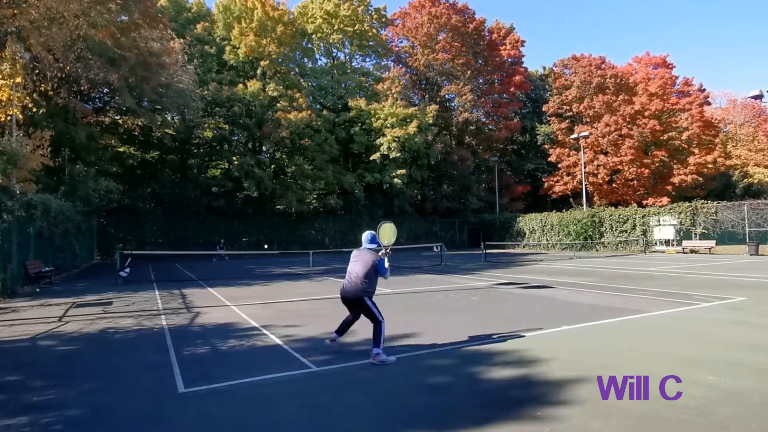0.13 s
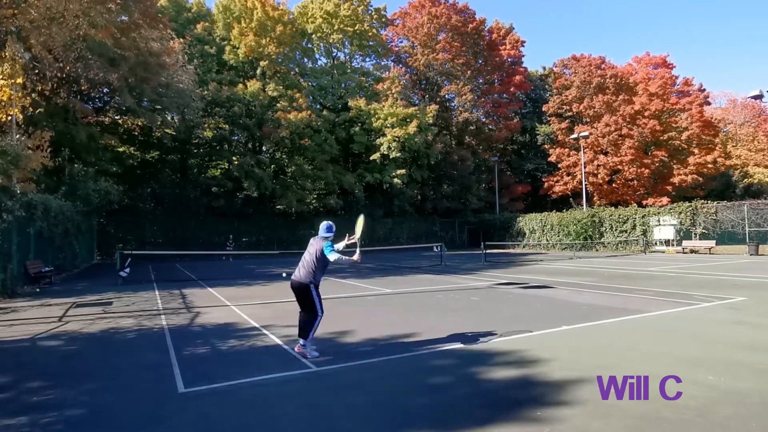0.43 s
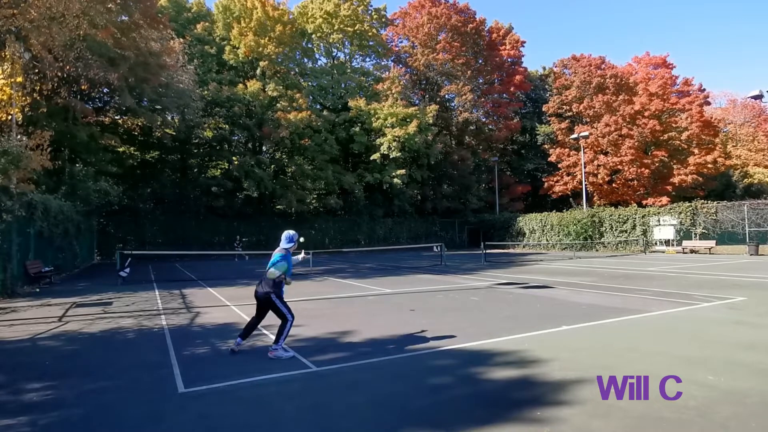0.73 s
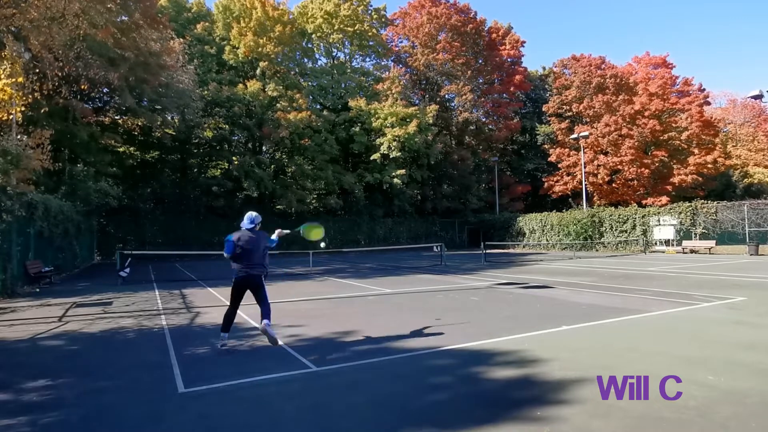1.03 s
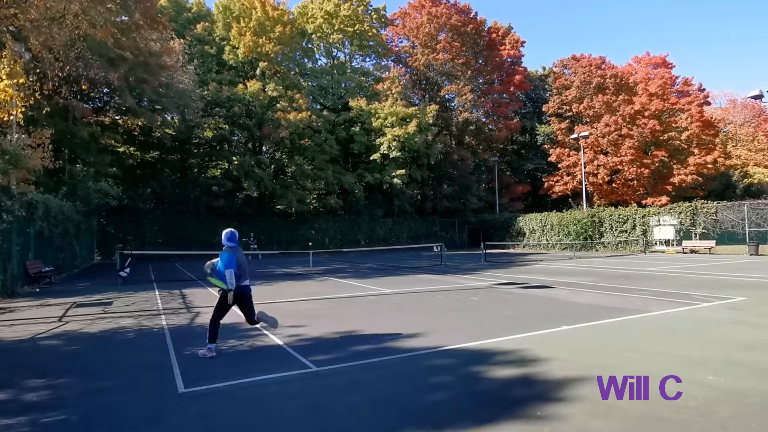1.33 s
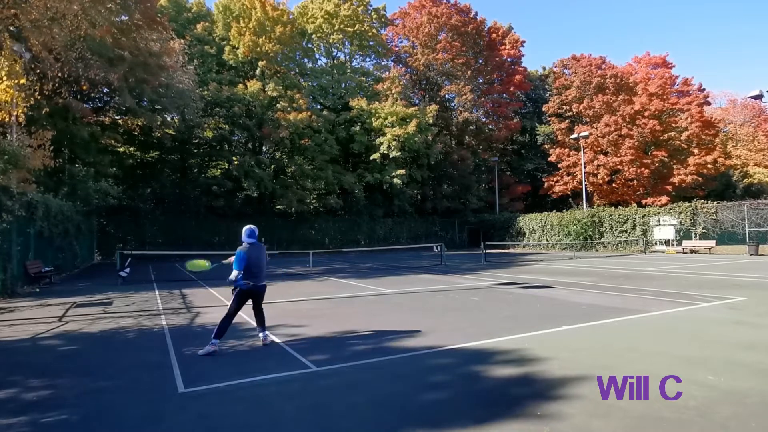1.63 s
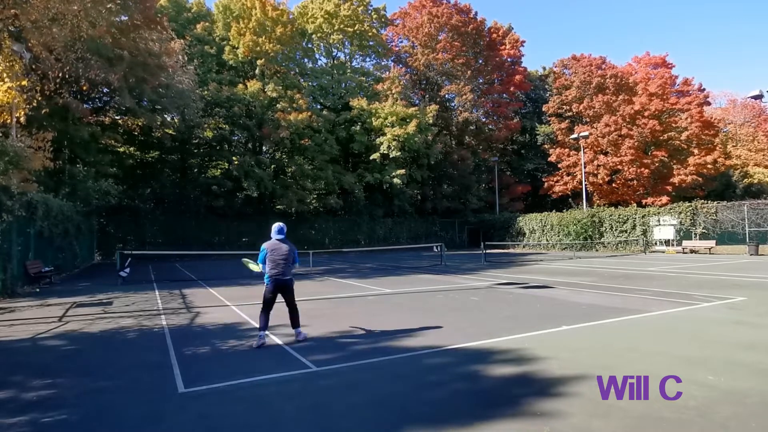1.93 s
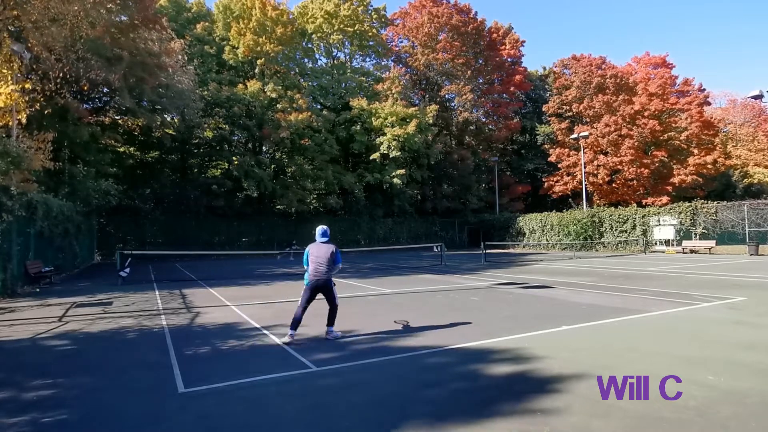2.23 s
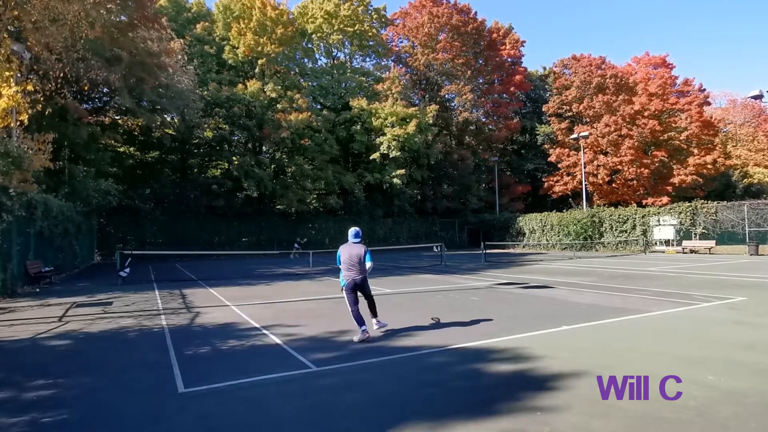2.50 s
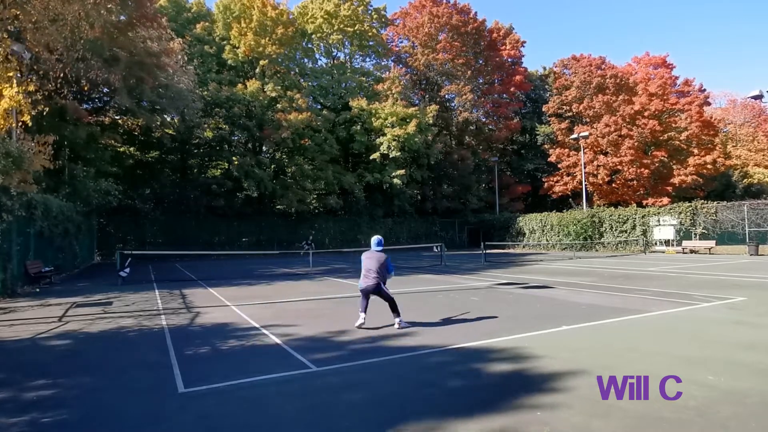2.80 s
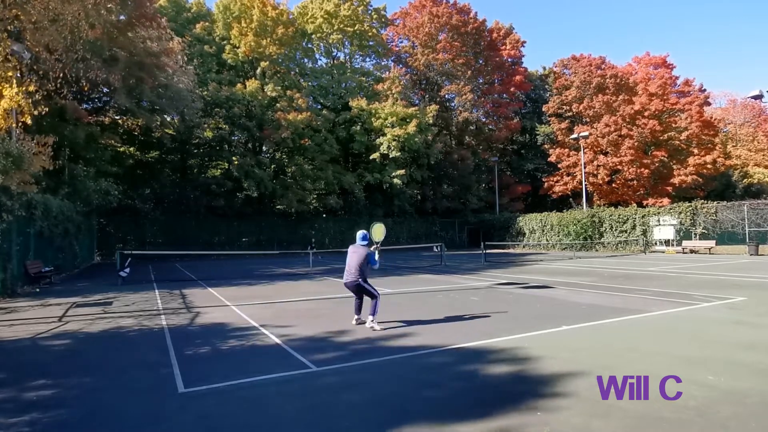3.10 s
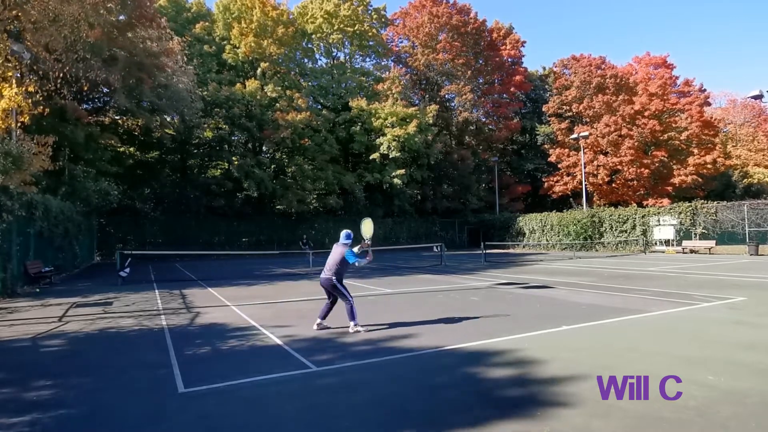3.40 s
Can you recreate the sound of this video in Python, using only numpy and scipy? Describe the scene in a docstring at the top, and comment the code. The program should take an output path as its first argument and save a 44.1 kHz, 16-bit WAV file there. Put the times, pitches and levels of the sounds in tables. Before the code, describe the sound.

Sharp racket hit on a tennis ball outdoors, amid wind buffeting, shoe scuffs and distant knocks

```python
"""Outdoor tennis court, heard a few metres away through the two microphone ports of a camera.
Throughout, traffic and leaves hiss as shaped noise, and wind buffets each port with high-passed pulses.
Early on, shoes scuff the grit (gliding noise bands) and balls knock farther off (clicks and thuds).
Then a racket strikes a ball: three force pulses ring damped modes under a noise crack, and narrow hisses
linger. More knocks and scuffs follow; ground, fences and trees echo the stroke and the knocks."""
import sys
import numpy as np
from scipy import signal
from scipy.fft import rfft, irfft
from scipy.io import wavfile
from scipy.ndimage import uniform_filter1d

SR = 44100
rng = np.random.default_rng(int(sys.argv[2]) if len(sys.argv) > 2 else 0)


def boost_factor(decibels):
    """Convert a level in decibels to a linear amplitude factor."""
    exponent = np.asarray(decibels, float) / 20
    return 10 ** exponent


def output_pcm(signal):
    """Save a mono or channel-first signal as 16-bit PCM at the path in sys.argv[1].

    Samples are clipped to [-1, 1] before scaling.
    """
    pcm = np.clip(np.atleast_2d(signal).T, -1, 1) * 32767
    wavfile.write(sys.argv[1], SR, np.round(pcm).astype(np.int16))


N = 156555  # length [samples]


def evened(x):
    """Normalization: scales a signal to an rms of 1."""
    return x / np.sqrt(np.mean(x ** 2) + 1e-20)


def read(points, hz):
    """Interpolation of a (frequency [Hz], value) table on a logarithmic frequency axis."""
    f, value = np.transpose(points)
    return np.interp(np.log(hz + 1), np.log(f + 1), value)


def add(mix, s, sound):
    """Superposition: adds a sound to the mix at time s."""
    part = mix[round(s * SR):][:len(sound)]
    part += sound[:len(part)]


def coloured(x, table):
    """Linear filtering: weights the spectrum by a (frequency [Hz], gain [dB]) table."""
    hz = np.fft.rfftfreq(N, 1 / SR)
    return irfft(rfft(x) * boost_factor(read(table, hz)), N)


def pair(size, likeness, hz):
    """Partial coherence: random spectra (2, bins, frames) with a given left-right likeness."""
    frames = N // (size // 4) + 5
    a, b, c, d = rng.standard_normal((frames, len(hz), 4)).T
    common, other = a + 1j * b, c + 1j * d
    likeness = np.clip(likeness, -1, 1)
    return np.array([common, likeness * common + np.sqrt(1 - likeness ** 2) * other])


def bump(width_ms):
    """Gaussian pulse of given full width at half height, centred on sample 900."""
    ms = np.arange(-900, 901) / SR * 1000
    return np.exp(-np.log(16) * (ms / width_ms) ** 2)


# relative spectral density of distant traffic and leaves: (frequency [Hz], density [dB per Hz])
AIR_SPECTRUM = [(120, -30), (200, -3), (227, -6), (263, -9), (316, -9.5), (500, -9.5), (558, -8), (806, -8),
                (1590, -19.5), (2330, -17.5), (3130, -21), (6880, -21.5), (16000, -32.5)]
# likeness of the distant hiss at the two ports: (frequency [Hz], left-right likeness)
AIR_LIKENESS = [(200, 1), (400, 0.71), (700, 0.48), (1400, 0.21), (3000, 0.033), (15000, .05)]
AIR_RMS_DB, TRAFFIC_LAG_SAMPLES = -51, 13
PATCHY_DB, SWELL_DB = 1.4, -0.55


def air():
    """Diffuse noise field: far hiss of random spectra with drifting patches and a slow swell."""
    hz = np.fft.rfftfreq(1024, 1 / SR)
    z = pair(1024, read(AIR_LIKENESS, hz)[:, None], hz)
    # traffic lies to the right, so the left port hears it later
    z[0] *= np.exp(-2j * np.pi * hz * TRAFFIC_LAG_SAMPLES / SR)[:, None]
    field = rng.standard_normal(z.shape[1:])
    across_bins = uniform_filter1d(field, size=14, axis=0)
    patches = evened(uniform_filter1d(across_bins, size=12, axis=1))
    swell = evened(uniform_filter1d(field.mean(0), size=40))
    z = z * boost_factor(read(AIR_SPECTRUM, hz)[:, None] + PATCHY_DB * patches + SWELL_DB * swell)
    hiss = signal.istft(z, nperseg=1024, noverlap=768)[1][:, :N]
    return boost_factor(AIR_RMS_DB) * evened(hiss)


# gusts, before the eddy trim and the split by port:
# (time [s], level [dB], left minus right [dB])
GUST_LEVELS = [(0.0, -25.5, -2), (0.02, -31.5, 6), (0.23, -34, 6), (0.32, -35, 8), (0.36, -42, 9.5),
               (0.64, -37, 4), (0.67, -30.5, 5), (0.71, -34.5, -11), (0.85, -32, 14), (0.93, -43, -6.5),
               (1.02, -36.5, -16), (1.06, -37.5, 24), (1.12, -35, -3), (1.26, -34.5, 11), (1.31, -29, 22),
               (1.38, -36, 14), (1.45, -42, 3), (1.5, -42, 4.5), (1.91, -30, -7), (2.37, -46, 13),
               (2.66, -34, -1.5), (2.74, -30, 4), (2.97, -34, 0.5), (3.0, -30.5, -6), (3.1, -38, -15),
               (3.16, -36, 1), (3.22, -33, 4), (3.28, -32.5, 18), (3.34, -39.5, 7.5), (3.55, -35.5, 3)]
# strongest single buffets at each port, before the buffet gain and the vent:
# (time [s], signed peak pressure, full width at half height [ms])
LEFT_PUSHES = [(0.028, 0.37, 3.8), (0.0732, 0.22, 3.06), (0.01, -.07, 4.4), (0.1, 0.13, 4.7),
               (.11, 0.19, 5.6), (.595, .07, 5.8), (1.16, 0.061, 2.5), (1.283, -0.03, 8.1),
               (2.982, .06, 3.6), (3.183, -0.078, 2.8), (3.28, -0.12, 2.4), (3.402, 0.077, 3.4),
               (0.1303, 0.055, 7.5), (0.2554, 0.16, 4.3), (0.2976, 0.16, 6.9), (0.3156, 0.16, 8.3),
               (0.6788, 0.31, 4.15), (0.6967, -0.1, 4.3), (0.7316, -0.17, 5.1), (0.759, 0.2, 6.3),
               (0.8224, -0.12, 3.85), (0.838, 0.081, 4.6), (1.1072, 0.15, 3.2), (1.222, 0.13, 6.1),
               (1.3105, -0.24, 4.2), (1.3454, -0.1, 2.86), (1.4385, 0.13, 4.1), (1.9459, 0.13, 2.5),
               (2.6353, -0.12, 4.8), (2.7421, 0.29, 3.46), (2.8412, 0.17, 3.17), (2.8864, 0.13, 3.5),
               (3.1656, 0.14, 2.8), (3.2699, 0.13, 2.03)]
RIGHT_PUSHES = [(0.2485, 0.063, 4.9), (0.6968, -0.12, 4.9), (0.781, -0.077, 2.5), (1.005, 0.032, 2.1),
                (1.823, -0.026, 2.4), (1.871, 0.044, 3.7), (2.0, -0.07, 3.3), (2.692, 0.072, 3.2),
                (2.718, -0.017, 4.4), (3.152, -0.12, 12), (3.455, 0.098, 8.6), (1.7316, 0.11, 2.7),
                (1.8512, 0.083, 1.3), (1.91, 0.12, 3), (1.932, -0.17, 2.94), (1.945, 0.083, 3.3),
                (1.9624, -0.14, 2.9), (2.6367, 0.1, 7), (2.995, 0.22, 9.4), (3.0154, 0.1, 6.1),
                (3.057, -0.05, 6), (3.071, -0.068, 2.24), (3.113, 0.052, 4.2)]
# small eddies, drawn with equal chance: full width at half height [ms]
EDDY_WIDTHS = (2.85, 4.46, 4.73, 9.2)
BUFFET_GAIN_DB, EDDY_TRIM_DB = 4, -1.5
EDDIES_PER_S, EDDY_SPREAD_DB = 130, 3.0
VENT_CUT_HZ, VENT_Q = 36.5, 0.62


def wind():
    """Turbulent pressure through a second-order high-pass: the vent makes each push swing and dip."""
    s, level_db, pan_db = np.transpose(GUST_LEVELS)
    t, out = np.arange(N) / SR, np.zeros((2, N))
    level, pan = np.interp(t, s, level_db), np.interp(t, s, pan_db)
    hit, size, sign, kind = rng.random((4, 2, N))
    strength = boost_factor(-EDDY_SPREAD_DB * np.log(size + 0.14))
    kicks = (hit < EDDIES_PER_S / SR) * strength * np.where(sign < 0.65, 1, -1)
    kind = (kind * len(EDDY_WIDTHS)).astype(int)
    # the port vents away slower pressure
    cut = 2 * np.pi * VENT_CUT_HZ
    b, a = signal.bilinear([1, 0, 0], [1, cut / VENT_Q, cut ** 2], SR)
    for port, buffets in enumerate((LEFT_PUSHES, RIGHT_PUSHES)):
        eddies = np.zeros(N)
        for k, width_ms in enumerate(EDDY_WIDTHS):
            eddies += signal.oaconvolve(kicks[port] * (kind[port] == k), bump(width_ms), "same")
        # the two shares of power sum to one
        share = 1 / (1 + boost_factor(2 * pan * (2 * port - 1)))
        gain = boost_factor(level + EDDY_TRIM_DB) * 2 * np.sqrt(share)
        pushes = np.zeros(N)
        for at, peak, width_ms in buffets:
            add(pushes, at - 900 / SR, peak * bump(width_ms))
        out[port] = evened(signal.lfilter(b, a, eddies)) * gain
        out[port] += boost_factor(BUFFET_GAIN_DB) * signal.lfilter(b, a, pushes)
    return out


# decay of echoes from ground, fences and trees: (frequency [Hz], t60 [s])
COURT_DECAY = [(300, 0.32), (1000, 0.24), (2500, 0.28), (7000, 0.4), (15000, 0.078)]
COURT_GAP_S = 0.004  # silence ahead of the first reflection


def court(x):
    """Reverberation: sparse reflections of random sign, each band decaying exponentially at its own rate."""
    taps, first = np.zeros((2, SR // 2)), round(COURT_GAP_S * SR)
    # one reflection in every 20 samples, placed independently for each port
    at = first + np.arange(0, 18000, 20) + rng.integers(0, 20, (2, 900))
    np.put_along_axis(taps, at, rng.choice([-1., 1.], at.shape), 1)
    hz, t, z = signal.stft(taps, SR, nperseg=128)
    decay = boost_factor(-60 * t / read(COURT_DECAY, hz)[:, None])
    tail = signal.istft(z * decay, SR, nperseg=128)[1]
    return signal.fftconvolve(x[None], tail / np.linalg.norm(tail[0]), axes=1)[:, :N]


# shoe scuffs, and narrow hisses that linger after the stroke; levels before crackle and body colour:
# (start [s], length [s], level [dB], start frequency [Hz], end frequency [Hz],
#  half width at 1/e of the power [octaves], place of the peak [0-1, held within 0.05-0.9])
HISS_BANDS = [(0, 0.14, -47.5, 5100, 3470, 1.9, 0.03), (0.073, 0.061, -41.5, 6800, 7200, 1.03, 0),
              (0.342, 0.012, -54.5, 5000, 5000, 1.2, 0.4), (0.55, 0.13, -48, 15500, 13400, 0.44, 0.55),
              (0.587, 0.1, -58, 4000, 4020, 1.2, 0.44), (1.033, 0.044, -49.5, 9400, 8450, 0.96, 0.34),
              (1.116, 0.047, -41, 8000, 7000, 0.52, 0.32), (1.127, 0.044, -48.5, 2030, 2020, 0.46, 0),
              (1.195, 0.033, -60, 2100, 2100, 0.11, 0.3), (1.164, 0.031, -56, 7000, 6800, 0.081, .5),
              (1.166, 0.08, -60, 4230, 4430, 0.18, 0.14), (1.261, 0.045, -52, 5300, 5440, 0.73, 0.1),
              (1.61, 0.089, -52, 8040, 5000, 1.2, .5), (1.805, 0.026, -49, 7960, 8000, 0.82, 0.2),
              (1.811, 0.19, -46.5, 6700, 4640, 0.56, 0.18), (1.818, .19, -46.5, 7840, 2980, 1.45, 0.24),
              (2.336, 0.037, -54, 12000, 12000, 0.85, .5), (2.426, 0.076, -51.5, 10000, 10000, 1.9, 0.1),
              (2.466, 0.14, -61, 12800, 12800, 1.5, 0.3), (2.693, 0.01, -52.5, 8050, 8000, 0.37, 0),
              (2.872, .055, -51, 12000, 14000, 0.8, 0.05), (3.002, 0.063, -56, 13000, 10000, 0.58, .7),
              (3.029, 0.064, -50, 3100, 3400, 1.2, 0.26), (3.113, 0.085, -48.5, 4150, 3900, 1.27, 0.2),
              (3.123, 0.088, -55, 2500, 1950, 0.17, 0.42), (3.132, 0.2, -59, 2600, 2400, 1.3, 0.1),
              (3.253, 0.065, -55, 12000, 12000, 1.1, 0.6), (3.384, 0.13, -52.5, 3500, 3480, 1.3, 0.55)]
# likeness of these bands at the two ports: (frequency [Hz], left-right likeness)
HISS_LIKENESS = [(2000, 0.81), (5000, 0.22), (12000, 0.21)]
CRACKLE_DB, SWELL_SHARPNESS = 2.5, 0.97


def scuffs_and_hisses():
    """Filtered noise: shoe scuffs on grit, and narrow hisses lingering after the stroke,
    as crackling bands whose centre may glide."""
    hz = np.fft.rfftfreq(128, 1 / SR)
    z = pair(128, read(HISS_LIKENESS, hz)[:, None], hz)
    t, power = np.arange(z.shape[2]) * 32 / SR, 0
    for start, length, db, from_hz, to_hz, octaves, top in HISS_BANDS:
        u, top = np.clip((t - start) / length, 0, 1), np.clip(top, 0.05, 0.9)
        rise_and_fall = np.minimum(u / top, (1 - u) / (1 - top))
        swell = np.sin(np.pi / 2 * rise_and_fall) ** SWELL_SHARPNESS
        centre_hz = from_hz + (to_hz - from_hz) * u
        band = np.exp(-(np.log2((hz[:, None] + 1) / centre_hz) / octaves) ** 2)
        power = power + band / band.mean(0) * (swell * boost_factor(db)) ** 2
    crackle = boost_factor(CRACKLE_DB * np.minimum(rng.exponential(size=len(t)), 4))
    plain_rms = signal.istft(z, nperseg=128, noverlap=96)[1].std()
    bands = signal.istft(z * np.sqrt(power) * evened(crackle), nperseg=128, noverlap=96)[1]
    return bands[:, :N] / plain_rms


# balls on ground and far rackets, levels before body colour:
# (time [s], thud level [dB], thud frequency [Hz], thud length [cycles, its peak falls at half],
#  click level [dB], click frequency [Hz], click t60 [s], felt hiss level [dB], left port later by [samples])
FAR_KNOCKS = [(0.3812, -45, 700, 0.78, -45, 1270, .012, -70, -8),
              (0.4452, -24.5, 271, 0.92, -31, 1350, 0.007, -37, -5),
              (.812, -37.5, 486, 1.25, -52.5, 1500, .012, -70, -6),
              (1.2655, -39, 800, 1.1, -35.5, 1380, 0.0071, -50, -6),
              (1.801, -59, 600, 0.93, -45, 1960, 0.0066, -65, -4),
              (2.398, -25, 407, 0.97, -36, 1240, 0.015, -61, -4),
              (2.7218, -29.5, 434, 1.9, -33.5, 2450, 0.0034, -42, 1.5),
              (2.7242, -41.5, 765, 1.8, -36.5, 1880, 0.0082, -60, 4),
              (2.7959, -22.5, 263, 0.84, -24, 1620, 0.0054, -44, -2),
              (2.796, -28, 730, 0.88, -28, 3200, 0.0038, -70, -3.5)]
THUD_LAG_S, FELT_T60_S = 0.00091, 0.012


def knocks():
    """Impact radiation: a dry click with a puff of felt, then a round thud of the hollow ball."""
    t, out = np.arange(2000) / SR, np.zeros((2, N))
    for s, thud_db, thud_hz, cycles, click_db, click_hz, click_t60, felt_db, lag in FAR_KNOCKS:
        u = np.maximum(t - THUD_LAG_S, 0) * thud_hz  # cycles since the thud began
        swell = (2 * u / cycles) ** 2 * np.exp(2 - 4 * u / cycles)
        thud = boost_factor(thud_db) * swell * np.sin(2 * np.pi * u - 1.2)
        attack = np.minimum(t * click_hz * 2, 1)
        click = -attack * np.sin(2 * np.pi * click_hz * t) * boost_factor(click_db - 60 * t / click_t60)
        felt = rng.standard_normal(len(t)) * boost_factor(felt_db - 60 * t / FELT_T60_S)
        sound = thud + click + felt
        add(out[0], s + lag / SR, sound)
        add(out[1], s, sound)
    return out


# force pulses as the strings bite and the ball flattens and leaves:
# (time [s], pulse area [dB], full width at half height [ms], signed weight [- pull, + push])
STROKE_FORCES = [(1.1228, -28.5, 0.14, -0.74), (1.1243, -13, 0.53, 0.83), (1.1262, -15.5, 0.072, 0.41)]
# modes of ball and strung frame: (frequency [Hz], level [dB], t60 [s])
RACKET_MODES = [(181, -2, 0.018), (2780, -24, .015), (445, -17, 0.078), (700, 0, 0.0074),
                (1020, -12.5, 0.037), (1240, -11.5, 0.023), (1500, -19, 0.036), (1770, -1, 0.013),
                (1990, -19, 0.036), (2270, -16, 0.027), (3820, -11.5, 0.024)]
CRACK_DB, CRACK_T60_S = -20.5, 0.022  # level before the crack's own filter


def stroke():
    """Modal excitation: three quick force pulses ring ball and frame, as felt tears over strings in a crack."""
    t, force, noise = np.arange(6000) / SR, np.zeros(N), np.zeros(N)
    for s, db, width_ms, weight in STROKE_FORCES:
        push = bump(width_ms)
        add(force, s - 900 / SR, weight * boost_factor(db) * push / push.sum())
    ring = np.zeros(len(t))
    for hz, db, t60 in RACKET_MODES:
        ring += boost_factor(db - 60 * t / t60) * np.sin(2 * np.pi * hz * t)
    attack = np.minimum(t / 0.0009, 1)
    burst = boost_factor(CRACK_DB - 60 * t / CRACK_T60_S) * attack * rng.standard_normal(len(t))
    add(noise, STROKE_FORCES[0][0], burst)
    crack = coloured(noise, [(2500, -10.5), (3500, 0.5), (14000, -7)])
    return signal.oaconvolve(force, ring)[:N] + crack


# the player moves across the court: (time [s], left port later by [samples])
PLAYER_PATH = [(0, 3), (.15, 2), (.55, -3), (1.05, -4), (1.12, -3), (1.3, -6), (1.9, -6), (2.45, -2),
               (3.05, 1), (3.2, 1), (3.45, -2)]


def from_player(x):
    """Time difference of arrival: the left port's delay varies as the player moves."""
    n = np.arange(N)
    s, lag = np.transpose(PLAYER_PATH)
    delay = np.interp(n / SR, s, lag).round().astype(int)
    x[0] = x[0][np.clip(n - delay, 0, N - 1)]
    return x


# colour of the camera body for near sounds: (frequency [Hz], gain [dB])
BODY_COLOUR = [(300, -1.5), (1500, 4), (2200, 6.5), (3200, 0.5), (4300, 3), (5200, 3.5), (7100, 5.5),
               (8500, -2), (11000, 0.5), (15500, 1)]


def through_body(x):
    """Linear response of the camera body, alike at both ports."""
    return coloured(x, BODY_COLOUR)


# difference between the microphone ports: (frequency [Hz], left minus right [dB])
PORT_DIFFERENCE = [(380, 0), (700, -4.5), (1290, -1.5), (2380, -3), (4400, 0), (8120, -1), (15000, -10)]


def through_ports(x):
    """Unequal port responses: each port takes half the level difference, with opposite sign."""
    left = coloured(x[0], [(hz, db / 2) for hz, db in PORT_DIFFERENCE])
    right = coloured(x[1], [(hz, -db / 2) for hz, db in PORT_DIFFERENCE])
    return np.array([left, right])


def scene():
    """Superposition: near sounds pass the body, airborne sound passes the ports, wind adds at each port."""
    hit, balls = stroke(), knocks()
    player = from_player(hit + scuffs_and_hisses())
    echoes = boost_factor(-11.5) * court(hit + balls[1])
    near = through_body(player + balls + echoes)
    return through_ports(near + air()) + wind()


def top_cut(x):
    """Nothing passes above the cut-off."""
    return signal.sosfilt(signal.butter(12, 17100, fs=SR, output="sos"), x)


def record(dry):
    """Band limitation: a linear-phase low-pass at 15850 Hz sets the camera's upper edge."""
    lowpass = signal.firwin(401, 15850, window=("kaiser", 8), fs=SR)
    mix = signal.oaconvolve(dry, lowpass[None], "same")
    return top_cut(mix)


dry = scene()
out = record(dry)
output_pcm(out)
```